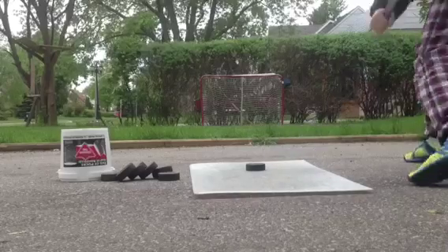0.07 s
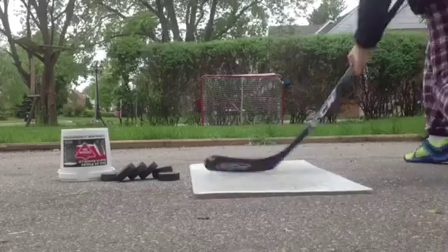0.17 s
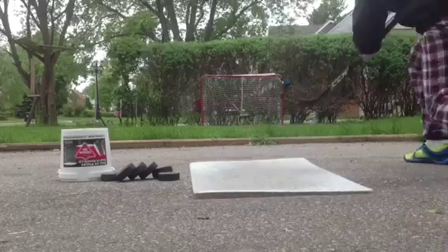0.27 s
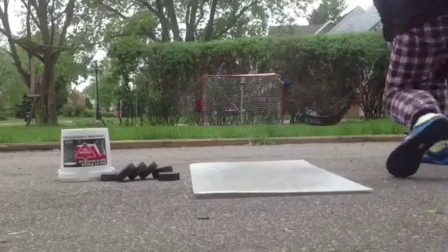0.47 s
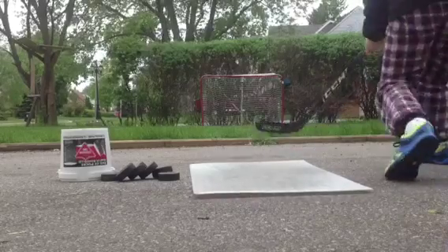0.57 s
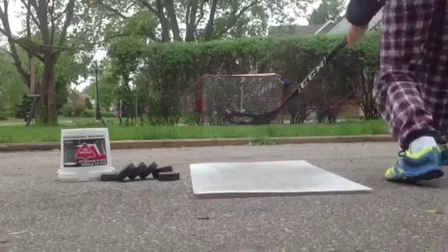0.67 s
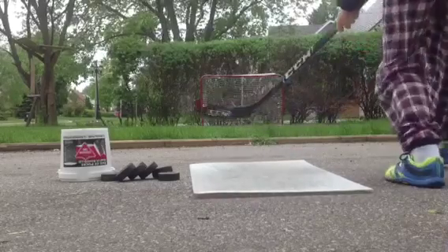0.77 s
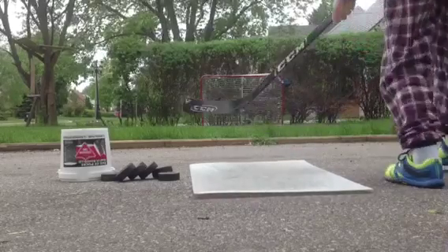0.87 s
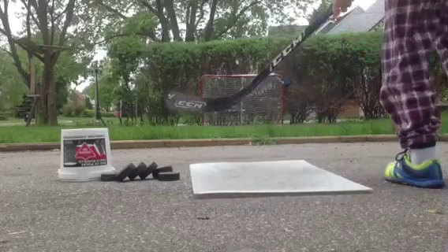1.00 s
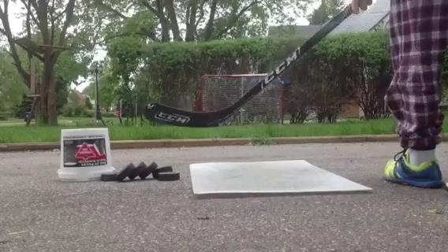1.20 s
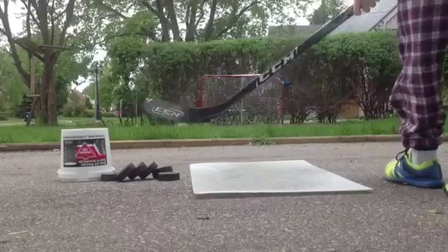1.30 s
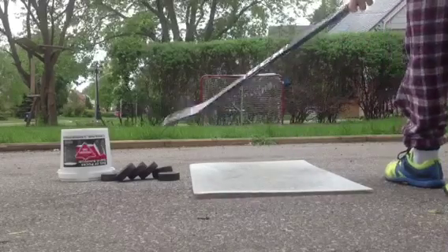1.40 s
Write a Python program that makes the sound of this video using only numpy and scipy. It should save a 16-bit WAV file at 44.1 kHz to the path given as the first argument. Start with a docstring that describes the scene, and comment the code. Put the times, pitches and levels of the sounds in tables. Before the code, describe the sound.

A sharp hockey slap shot outdoors, then the puck hits the goal with a brief ring.

```python
"""A hockey stick hits a slap shot off a plastic pad on a paved street: the blade slaps the pad, cracks into
the puck and chatters. Half a second later the puck strikes the goal, whose metal frame rings briefly.
Shoes thump softly and scrape over grit before and after the shot. Hedges and houses scatter the hits and
steps, over a quiet outdoor hum. The loudest peaks overload the microphone."""
import sys
import numpy as np
from scipy import signal
from scipy.fft import rfft, irfft
from scipy.io import wavfile
from scipy.ndimage import uniform_filter1d

SR = 44100
rng = np.random.default_rng(int(sys.argv[2]) if len(sys.argv) > 2 else 0)


def bounce(signal):
    """Save signal as a 16-bit WAV file at the path given by the first command-line argument."""
    frames = np.transpose(np.atleast_2d(signal))
    limited = np.clip(frames, -1, 1)
    pcm = np.round(limited * 32767).astype(np.int16)
    wavfile.write(sys.argv[1], SR, pcm)


N = 63945
T = np.arange(N) / SR
FREQS = np.maximum(np.fft.rfftfreq(2 * N, 1 / SR), 1)

# Blows of the blade on pad and puck. "Fade" always means the time to die away by 60 dB.
# (time [s], level [dB], fade [s], treble tilt [dB/octave], resonance [Hz], resonance boost [dB],
# stick ring [dB], pad thud [dB])
BLADE_BLOWS = [(0.2029, -8.5, 0.031, 0.5, 1450, 8, -27, -16),
               (0.2161, -7.5, 0.038, 0.1, 1190, 3.5, -19, -7), (0.2275, -26, 0.022, -1, 8500, 17, -48, -49),
               (0.2308, -14.5, 0.02, 1.5, 900, -5, -33, -38), (0.2413, -20, 0.031, 4.5, 4800, 17, -36, -62),
               (0.2549, -11.5, 0.042, -0.3, 2700, 7.5, -31, -40), (0.267, -17, 0.036, 0, 1600, 4, -47, -42)]
# Tone of the blade's crack (frequency [Hz], relative level [dB])
BLADE_SPECTRUM = [(60, -34), (200, -8.5), (450, -1.5), (800, -5), (1300, -1.5), (2100, -3), (2700, -4),
                  (3200, -13), (3850, 3), (4700, -8), (6000, -4.5), (8000, -15), (12000, -11.5),
                  (16000, -36)]
# Ringing tones of the stick (pitch [Hz], relative level [dB], fade [s])
STICK_TONES = [(853, -21, 0.58), (1195, -10.5, 0.15), (1310, -20, 0.04), (1730, -22, 0.071),
               (1814, -9, 0.5), (2830, -1.5, .1), (3230, -13, .22), (3856, 5, 0.042), (4197.7, -2, 0.054),
               (4382, -31, 0.17), (4391.7, -31, .24), (5670, -7, 0.11), (6450, 0, 0.033)]
# Tones of the pad on the pavement (pitch [Hz], relative level [dB], fade [s])
PAD_TONES = [(264.4, -11.5, 0.053), (425, -6.5, 0.037), (511, -10, 0.029), (830, -5, 0.031),
             (1194, -3, 0.03)]
# Bright snaps as the blade's edge meets the pad (time [s], level [dB], fade [s])
EDGE_SNAPS = [(0.2028, 2, 0.0032), (.2108, -17, 0.019), (0.2314, -17, 0.01004), (.2408, -16.5, .01)]
# The puck's hit on the goal and its rebounds (time [s], level [dB], fade [s], treble tilt [dB/octave],
# resonance [Hz], resonance boost [dB], frame ring [dB])
GOAL_HITS = [(0.7556, -13.5, 0.1, 0.5, 1700, 8, -27), (0.7591, -14, 0.027, -0.5, 2470, 11.5, -36),
             (0.7636, -16, 0.059, 0, 3680, 10, -46), (0.7734, -17.5, 0.05, -0.8, 1440, 0, -31.5)]
# Tone of the puck's clack on the goal (frequency [Hz], relative level [dB])
CLACK_SPECTRUM = [(60, -18), (250, -7.5), (600, -5), (900, -9.5), (1400, 1), (1900, -8), (2600, -4.5),
                  (3300, -7), (3900, -4.5), (6500, -8.5), (9000, -7), (12500, -6.5), (16000, -19)]
# Ringing tones of the goal frame (pitch [Hz], relative level [dB], fade [s])
FRAME_TONES = [(468.7, -9.5, 0.6), (576.5, -0.5, 0.17), (1090.7, -2, .7), (1432.4, -3.5, 0.63),
               (1456, 10.5, 0.046), (1674, -35, 0.1817), (1845, 14.5, 0.029), (2795, -21.5, 0.45),
               (3741, -29, 0.28), (3950, 2, 0.095), (4387, -22, 0.2614), (7300, -21, .2)]
# Dull footfalls (time [s], level [dB], pitch [Hz], rise [s], fade [s])
FOOT_THUMPS = [(.1435, -26, 477, 0.003, 0.019), (0.673, -19, 265, 0.00074, 0.011),
               (0.6816, -26.5, 191, 0.0025, 0.058), (0.844, -22.5, 158, 0.0044, .04),
               (1.178, -37, 278, .002, 0.049), (1.218, -28, 192, 0.0031, 0.014)]
# Shoe scuffs (time [s], level [dB], rise [s], fade [s], grit level [dB])
SHOE_SCUFFS = [(0.131, -34, 0.0073, 0.12, -55), (1.028, -32, 0.024, 0.048, -52)]
# A sole dragging over grit (time [s], length [s], level [dB])
SOLE_DRAGS = [(0.089, 0.064, -43), (0.344, 0.071, -38), (0.464, 0.02634, -44), (1.043, .07, -51)]
# Single grains cracking underfoot (time [s], level [dB])
GRAIN_CRACKS = [(0.0898, -33), (0.107, -32), (0.126, -36), (.1385, -44), (0.1479, -29)]
# Tone of the grit (frequency [Hz], relative level [dB])
GRIT_SPECTRUM = [(500, -8), (3500, -11.5), (5500, -2.5), (8000, -5.5), (12000, -8), (16000, -19)]
# Echoes of the street (frequency [Hz], relative early level [dB], relative late level [dB], late fade [s])
ECHO_BANDS = [(150, -14.5, -16, 1.7), (498, -8.5, -12, 0.56), (1620, -6.5, -10.5, 1.29),
              (4200, -4.5, -6.5, 0.9), (7600, -1.5, -3.5, 0.62), (13800, -4.5, -12.5, 0.42)]
# Tone of the outdoor hum (frequency [Hz], relative level [dB])
HUM_SPECTRUM = [(25, -41), (60, -38), (100, -9.5), (160, 1.5), (220, 0.5), (400, -4), (800, -7.5),
                (1500, -12.5), (3000, -21.5), (6000, -26.5), (12000, -35), (16000, -42)]


def slap_shot():
    """The blade slaps the pad, meets the puck and chatters; stick and pad ring."""
    out = np.zeros(N)
    for start, db, fade, tilt, peak_hz, boost_db, ring_db, thud_db in BLADE_BLOWS:
        out += gain(db) * crack(start, fade, contact_tone(BLADE_SPECTRUM, tilt, peak_hz, boost_db))
        out += gain(ring_db) * ring(start, STICK_TONES)
        out += gain(thud_db) * ring(start, PAD_TONES)
    for start, db, fade in EDGE_SNAPS:
        out += gain(db) * noise(hump(hz=11540, octaves=0.07)) * burst(start, rise=0.00025, fade=fade)
    return out


def air_puff():
    """One deep push of air as the hardest blow slams the pad flat."""
    start = max(BLADE_BLOWS, key=lambda blow: blow[1])[0]
    return gain(-26.5) * thump(start, hz=45, rise=0.003, fade=0.013)


def puck_on_goal():
    """The puck clatters against the goal and sets its metal frame ringing."""
    out = np.zeros(N)
    for start, db, fade, tilt, peak_hz, boost_db, ring_db in GOAL_HITS:
        out += gain(db) * crack(start, fade, contact_tone(CLACK_SPECTRUM, tilt, peak_hz, boost_db))
        out += gain(ring_db) * ring(start, FRAME_TONES)
    return out


def footsteps():
    """Soles thump, scuff and drag over the pavement, cracking single grains."""
    out = sum(gain(db) * thump(start, hz, rise, fade) for start, db, hz, rise, fade in FOOT_THUMPS)
    for start, db, rise, fade, grit_db in SHOE_SCUFFS:
        rub = gain(db) * noise(hump(hz=510, octaves=0.51))
        out += burst(start, rise, fade) * (rub + gain(grit_db) * grit())
    for start, length, db in SOLE_DRAGS:
        progress = np.clip((T - start) / length, 0, 1)
        swell = np.sqrt(np.abs(np.sin(np.pi * progress)))
        out += gain(db) * grit() * swell
    for start, db in GRAIN_CRACKS:
        out += gain(db) * crack(start, fade=0.0048, tone_db=curve(GRIT_SPECTRUM))
    return out


def grit():
    """Grit under a shoe makes a dense stream of tiny, uneven clicks."""
    clicks = rng.standard_normal(N) * (rng.random(N) < 0.1)
    return colour(clicks, curve(GRIT_SPECTRUM))


def street_echoes(sound, early_db, late_db):
    """Sound scatters back quickly from nearby things, then slowly from hedges and houses."""
    hz, *columns = np.array(ECHO_BANDS, float).T
    source, hiss = rfft(sound, 2 * N), rfft(rng.standard_normal(2 * N))
    early = burst(0, rise=0.0075, fade=0.24) ** 2
    out = np.zeros(N)
    for centre in 2 ** np.arange(7, 14.5, 0.5):  # bands half an octave apart
        near_db, far_db, fade = (np.interp(np.log(centre), np.log(hz), column) for column in columns)
        band = np.sqrt(np.maximum(1 - 2 * np.abs(np.log2(FREQS / centre)), 0))
        late = burst(0, rise=0.028, fade=fade) ** 2
        tail = gain(near_db + early_db) ** 2 * early / early.sum()
        tail += gain(far_db + late_db) ** 2 * late / late.sum()
        # Smear the band's energy over time, then let it set the loudness of a noise.
        energy = signal.fftconvolve(irfft(source * band)[:N] ** 2, tail)[:N]
        wash = irfft(hiss * band)[:N]
        out += wash / wash.std() * np.sqrt(np.maximum(energy, 0))
    return out


def outdoor_hum():
    """Distant traffic and leaves, wavering slightly."""
    waver_db = noise(hump(hz=6.6, octaves=0.69))  # about 1 dB either way
    return gain(-42 + waver_db) * noise(curve(HUM_SPECTRUM))


def crack(start, fade, tone_db):
    """A hard contact shakes at many frequencies at once and dies away fast."""
    envelope = burst(start, rise=0.0005, fade=fade)
    spectrum = rfft(rng.standard_normal(N) * envelope, 2 * N)
    # Even out the noise's chance peaks and dips over 500 Hz.
    power = uniform_filter1d(np.abs(spectrum) ** 2, size=int(500 * 2 * N / SR))
    even = irfft(spectrum / np.sqrt(power))[:N] * (T >= start)
    # A minimum-phase filter sets the tone without ringing before the hit.
    cepstrum = irfft(np.log(gain(tone_db)))[:N] * np.sign(T)
    tone_filter = np.exp(2 * rfft(cepstrum, 2 * N))
    hit = irfft(rfft(even, 2 * N) * tone_filter)[:N]
    return hit * np.linalg.norm(envelope) / np.linalg.norm(hit)


def contact_tone(spectrum, tilt, peak_hz, boost_db):
    """Each point of contact tilts the tone and favours one resonance; the result is in dB."""
    return curve(spectrum) + tilt * np.log2(FREQS) + boost_db * gain(hump(peak_hz, octaves=0.27))


def ring(start, tones):
    """A struck object rings at its own pitches, in a slightly different mix each time."""
    age = np.maximum(T - start, 0)
    out = np.zeros(N)
    for hz, db, fade in tones:
        strength = gain(db + rng.standard_normal())
        out += strength * np.cos(2 * np.pi * hz * age) * burst(start, rise=0.00025, fade=fade)
    return out


def thump(start, hz, rise, fade):
    """One short, dull tone."""
    return burst(start, rise, fade) * np.sin(2 * np.pi * hz * (T - start))


def burst(start, rise, fade):
    """Loudness over time: a straight rise, then a smooth fall (times in seconds)."""
    age = T - start
    return np.clip(age / rise, 0, 1) * np.exp(-np.log(1000) * np.maximum(age - rise, 0) / fade)


def gain(db):
    """Turn decibels into a multiplier."""
    return 10 ** (np.asarray(db) / 20)


def curve(points):
    """Join (Hz, dB) points into a full spectrum."""
    hz, db = np.array(points, float).T
    return np.interp(np.log(FREQS), np.log(hz), db)


def hump(hz, octaves):
    """A spectrum with one rounded peak, in dB."""
    return -20 * np.log10(1 + (np.log2(FREQS / hz) / octaves) ** 2 / 2)


def colour(sound, tone_db):
    """Filter a sound to a given tone and scale its level to 1."""
    shaped = irfft(rfft(sound, 2 * N) * gain(tone_db))[:N]
    return shaped / shaped.std()


def noise(tone_db):
    """Steady noise with a given tone."""
    return colour(rng.standard_normal(N), tone_db)


def low_cut(sound, hz):
    """Small objects give off little bass."""
    return signal.sosfilt(signal.butter(2, hz, "high", fs=SR, output="sos"), sound)


def scene():
    """Mix the shot, the goal and the feet with the street's echoes and hum."""
    shot = low_cut(slap_shot(), hz=109)
    goal = low_cut(puck_on_goal(), hz=130)
    steps = low_cut(footsteps(), hz=105)
    echoes = street_echoes(shot + gain(-7.5) * steps, early_db=-1, late_db=-1.93)
    echoes += street_echoes(goal, early_db=-7, late_db=-6.5)
    return (shot + air_puff() + goal + steps + echoes + outdoor_hum())[None]


def record(dry):
    """The microphone flattens the loudest peaks and cuts the treble above 15400 Hz."""
    flattened = dry / (1 + dry ** 4) ** 0.25
    return signal.sosfilt(signal.ellip(8, 0.2, 70, 15400, fs=SR, output="sos"), flattened)


dry = scene()
out = record(dry)
bounce(out)
```